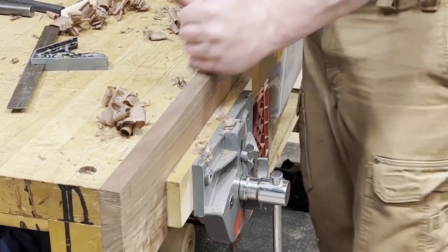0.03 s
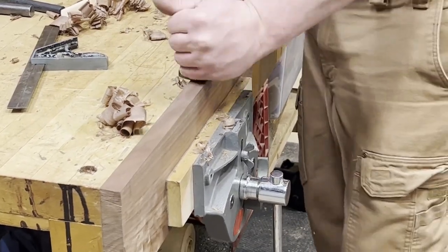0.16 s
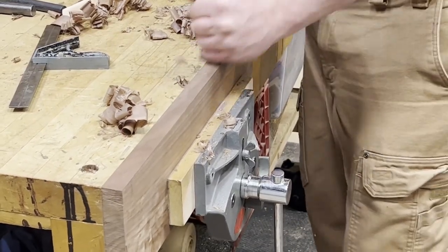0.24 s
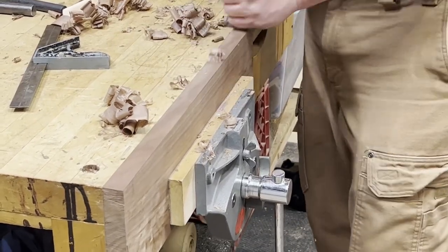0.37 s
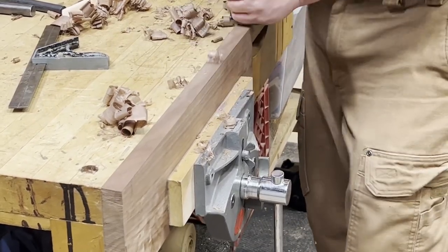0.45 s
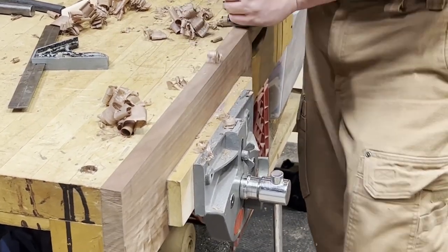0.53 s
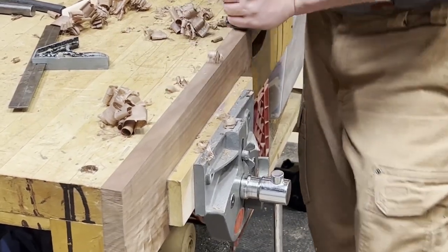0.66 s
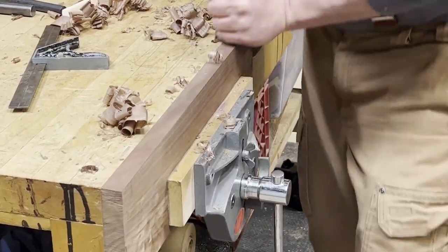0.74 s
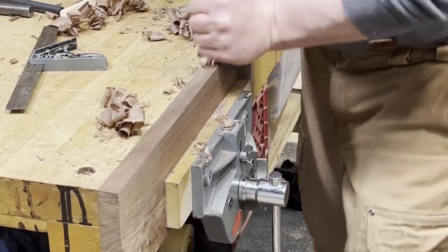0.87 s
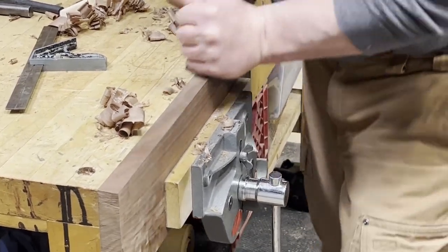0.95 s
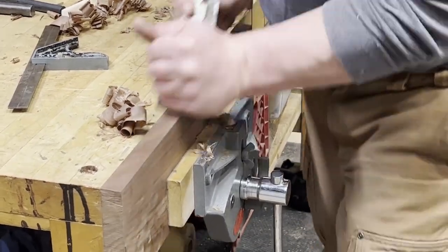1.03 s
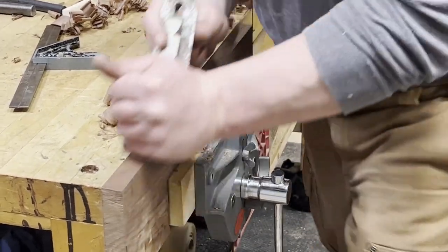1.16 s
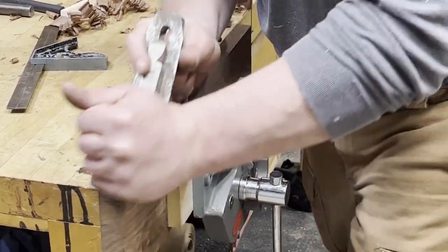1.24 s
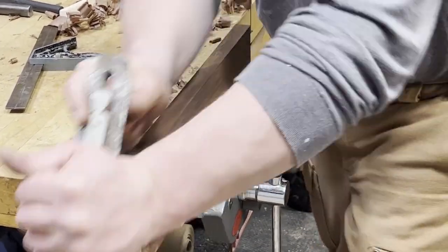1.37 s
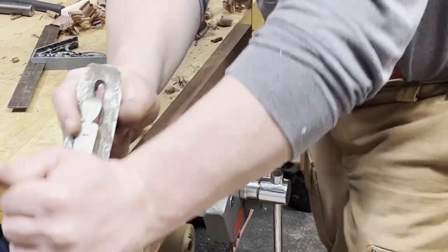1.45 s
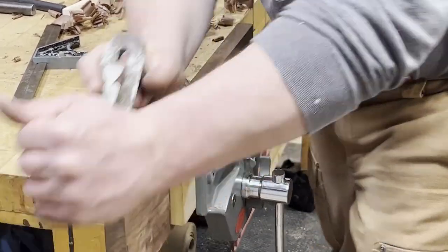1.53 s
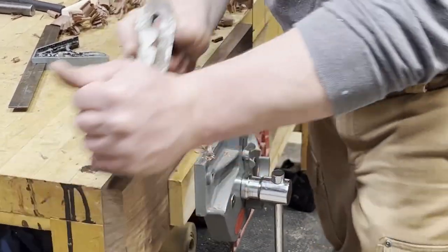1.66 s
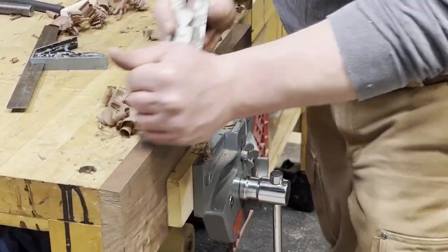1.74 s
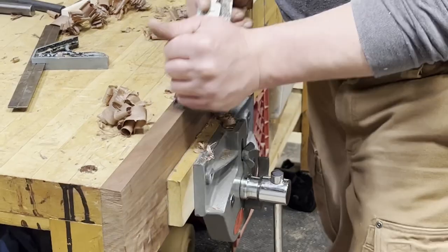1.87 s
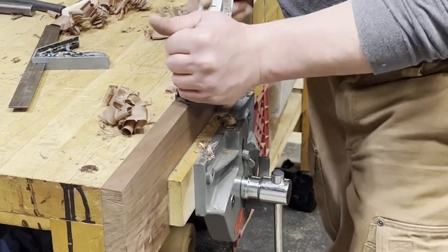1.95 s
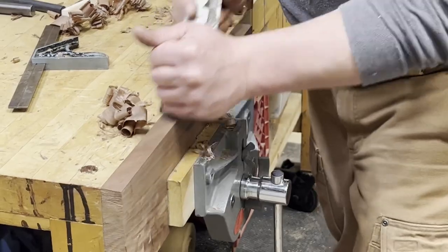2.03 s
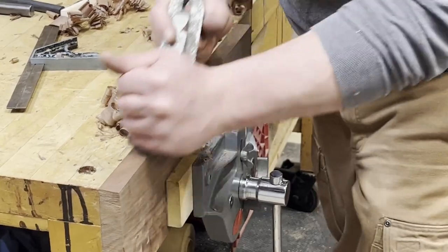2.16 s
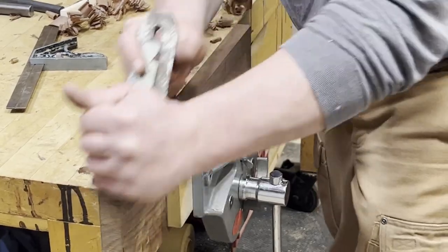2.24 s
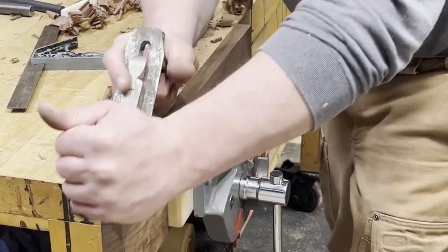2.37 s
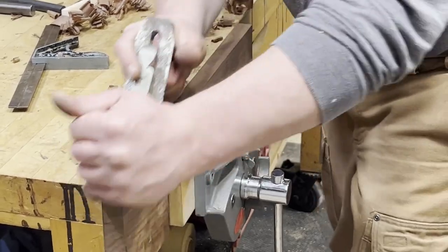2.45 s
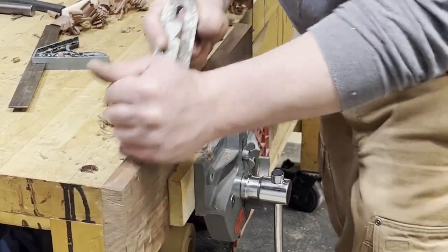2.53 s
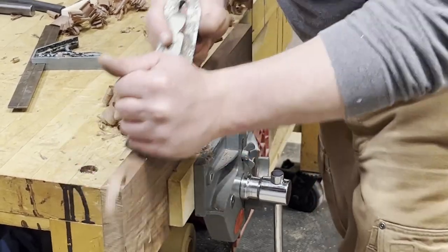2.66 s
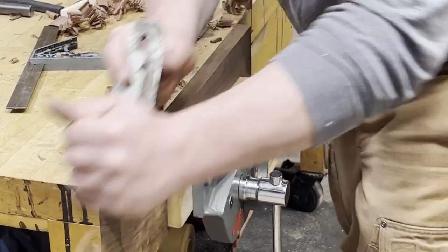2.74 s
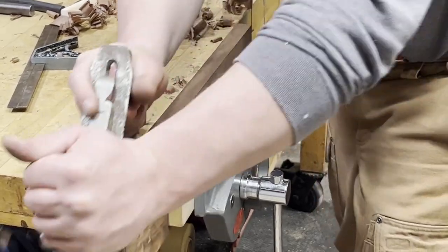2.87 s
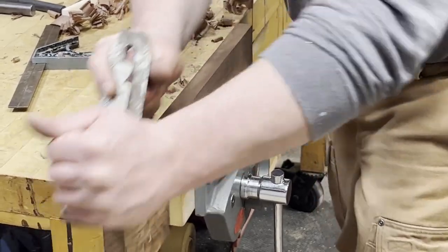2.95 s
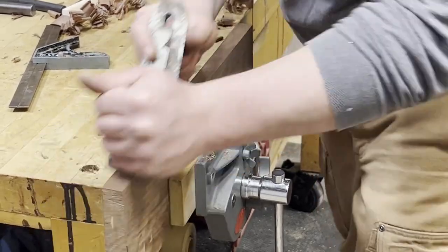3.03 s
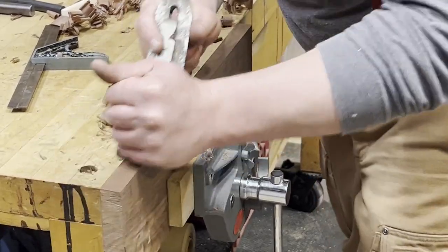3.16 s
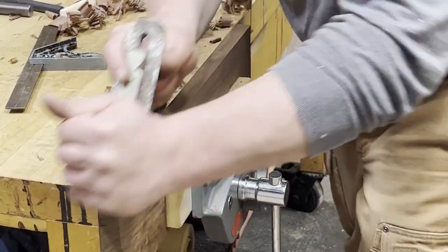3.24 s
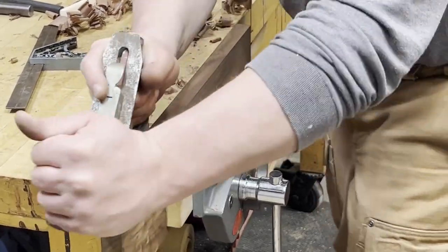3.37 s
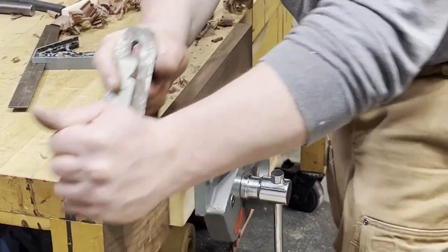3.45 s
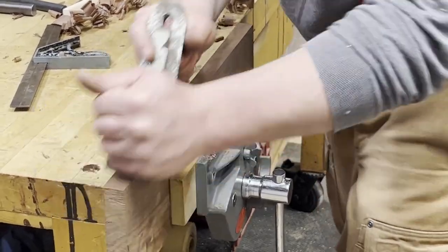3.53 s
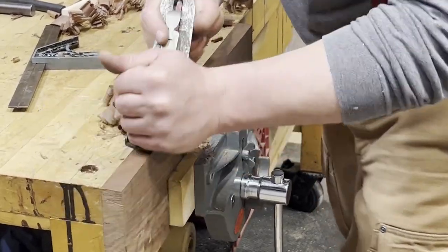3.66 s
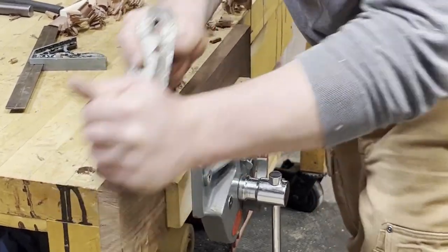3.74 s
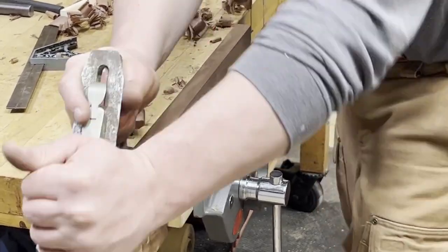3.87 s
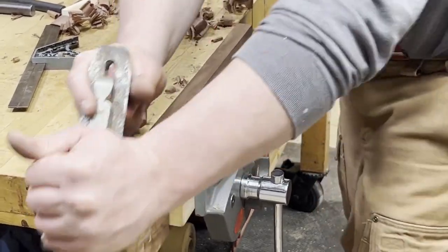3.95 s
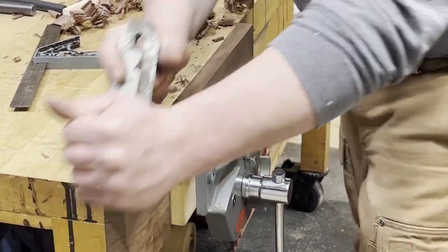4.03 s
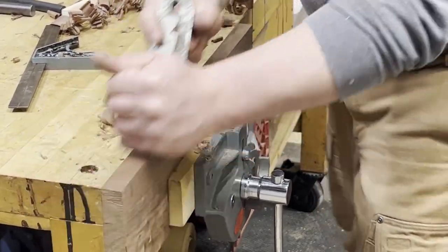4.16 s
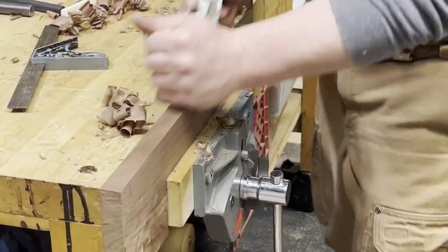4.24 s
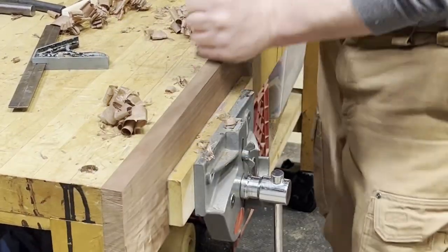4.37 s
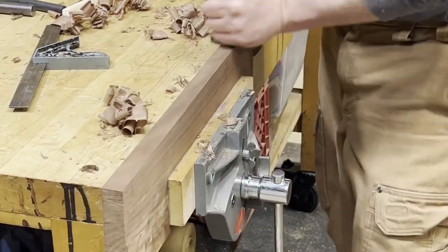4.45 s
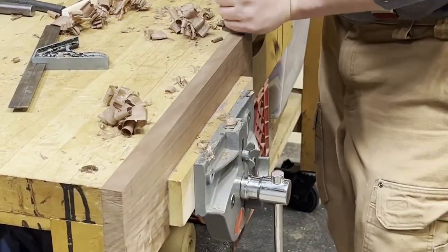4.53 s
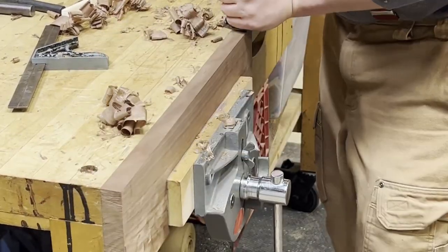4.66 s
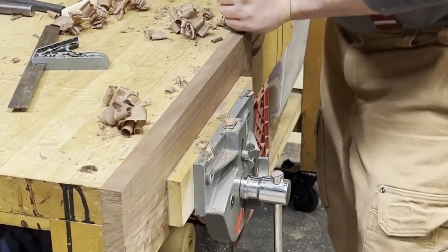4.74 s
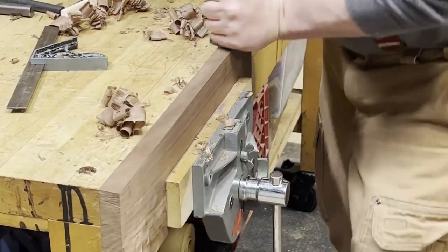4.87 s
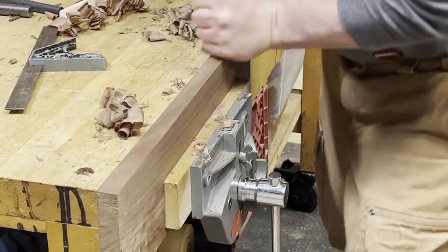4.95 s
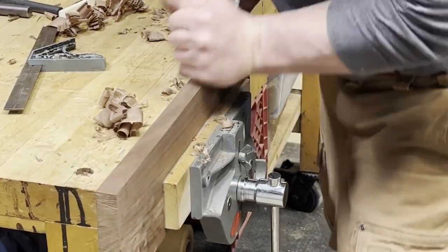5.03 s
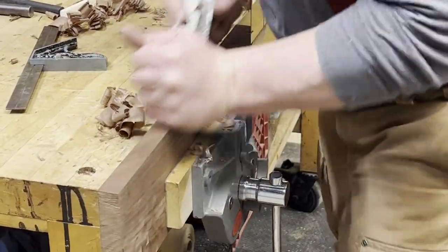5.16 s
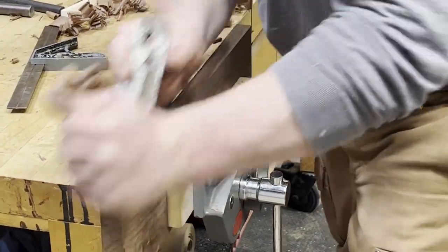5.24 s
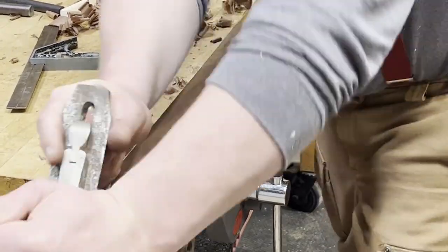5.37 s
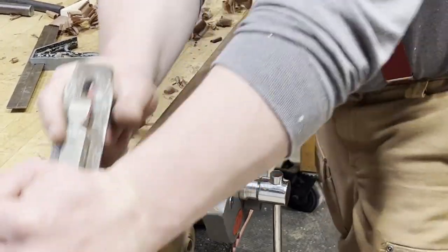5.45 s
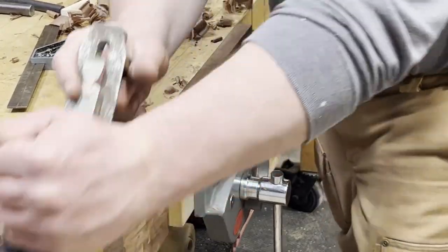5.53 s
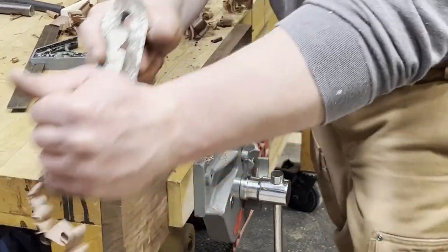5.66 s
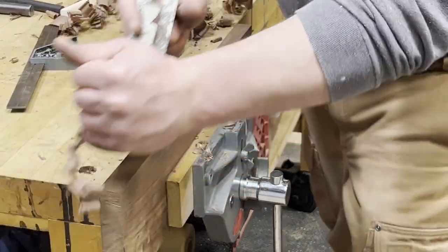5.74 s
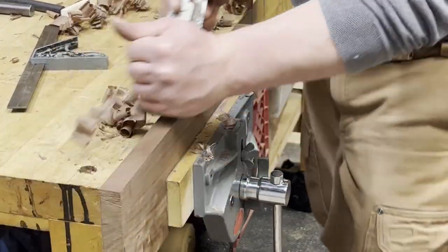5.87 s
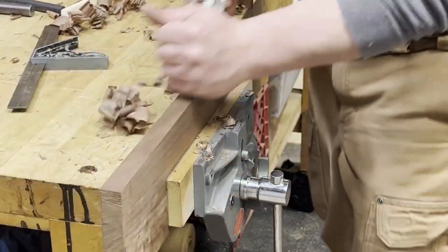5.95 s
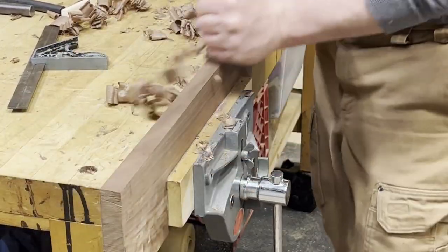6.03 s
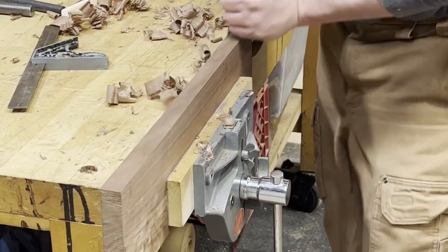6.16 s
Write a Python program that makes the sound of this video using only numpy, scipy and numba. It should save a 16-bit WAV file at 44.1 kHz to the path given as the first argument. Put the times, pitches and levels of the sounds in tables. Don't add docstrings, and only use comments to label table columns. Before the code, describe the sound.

A low, soft workshop hum runs throughout, with a short room tail behind close, dry sounds at a phone microphone. At 0 s the end of a planing cut rasps and rings for a tenth of a second, then light bumps and a brief rub follow. From 0.6 to 1.3 s a stroke tears in bursts, crisp shaving hiss with a high metallic ring around 3 kHz. Small taps follow, then a hard woody clack at 1.8 s. Cutting resumes at 2.1 s, interrupted by the heaviest knock at 2.4 s and a sharp one at 2.8 s, with rasps at 3.2 and 3.7 s. The plane skims faintly back at 4.0-4.4 s with a knock at 4.3. After near-quiet, a harder cut scrapes and snaps from 4.8 to 5.3 s, stutters in little bumps, then a set-down clack at 5.9 s and a last light skim.

```python
import sys
import numpy as np
from scipy import signal
from scipy.fft import rfft, irfft
from scipy.io import wavfile
from scipy.ndimage import uniform_filter1d, map_coordinates
from numba import njit

SR = 44100
rng = np.random.default_rng(int(sys.argv[2]) if len(sys.argv) > 2 else 0)


def amplitude_ratio(level_db):
    exponent = np.asarray(level_db, float) / 20
    return 10 ** exponent


def unload_wav(signal):
    wavfile.write(
        sys.argv[1],
        SR,
        np.round(np.clip(np.atleast_2d(signal).T, -1, 1) * 32767).astype(np.int16),
    )


N = 273416

GRIP_S = 0.0037
BODY_LAG_S = 0.01


def unit(x):
    return x / np.sqrt(np.mean(x ** 2))


def ring(x, modes):
    return sum((-1) ** k * amplitude_ratio(db) * signal.lfilter(*signal.iirpeak(hz, hz / width_hz, SR), x)
               for k, (hz, width_hz, db) in enumerate(modes))


def steady_ring(push, modes, level_db):
    return ring(amplitude_ratio(level_db) * push, modes) / np.std(ring(push[:SR], modes))


def colour(x, points):
    hz, db = np.transpose(points)
    bins = np.arange(1, N // 2 + 2) * SR / N
    return irfft(rfft(x) * amplitude_ratio(np.interp(np.log(bins), np.log(hz), db)), N)


def walk(rate_hz):
    k = int(SR / rate_hz)
    held = np.repeat(rng.standard_normal(N // k + 1), k)
    return unit(uniform_filter1d(held, k)[:N])


def fibres(rate_hz, spread_db, chatter_db, chatter_hz):
    clicks = (rng.random(N) < rate_hz / SR) * rng.standard_normal(N)
    clicks = clicks * amplitude_ratio(spread_db * np.minimum(rng.exponential(size=N), 3))
    return clicks * amplitude_ratio(chatter_db * walk(chatter_hz))


def flexed(x, rate_hz):
    delay = 0.004 * SR / rate_hz * uniform_filter1d(walk(rate_hz), int(SR / rate_hz / 2))
    return map_coordinates(x, [np.arange(N) - delay], order=3, mode="nearest")


# at_s, level_db
REST = [(0.15, -59.5), (.47, -63), (.59, -68), (.7, -68.5), (1.0, -53.5), (1.4, -62.5), (1.65, -70.5),
        (2.05, -69.5), (2.45, -65), (2.9, -63.5), (3.4, -63.5), (4.0, -66.5), (4.45, -57.5), (4.64, -84.5),
        (4.78, -68.5), (5.4, -62.5), (5.87, -72.5), (6.2, -66)]


def contact(rows, grip_s, fall_db_per_s, rest_db):
    t = np.arange(N // 64 + 2) * 64 / SR
    start_s, length_s, first_db, last_db = np.transpose(rows)[:, :, None]
    since = t - start_s
    slide_db = first_db + (last_db - first_db) * np.clip(since / length_s, 0, 1)
    fall_db = fall_db_per_s * np.maximum(since - length_s, 0)
    grip_db = 20 * np.log10(np.clip((since + 1e-4) / grip_s, 1e-6, 1))
    db = (slide_db - fall_db + grip_db).max(axis=0)
    db = np.maximum(db, rest_db + np.interp(t, *np.transpose(REST)))
    return np.interp(np.arange(N) / SR, t, db)


# at_s, board_db, board_hz, clack_db, tick_db
KNOCKS = [(0.272, -32, 367, -61, -50), (0.999, -42, 290, -54, -27.5), (1.761, -14, 386, -27, -16),
          (2.356, -11.5, 480, -22, -44), (2.767, -23, 368, -44, -14.5), (2.957, -31.5, 356, -45.5, -69),
          (3.307, -24.5, 342, -52, -27), (3.813, -32, 425, -60, -43), (3.912, -28.5, 300, -44, -65),
          (4.313, -19.5, 300, -41, -25.5), (5.529, -36.5, 332, -44, -71), (5.897, -15.5, 412, -30, -21.5)]
# at_s, board_db, clack_db, tick_db
TAPS = [(0.505, -38.5, -47.5, -39), (0.61, -51, -48.5, -28), (1.328, -34, -60, -22), (1.434, -34, -43, -68),
        (1.467, -33.5, -46, -36), (1.517, -41, -55, -40), (1.908, -56, -52.5, -42),
        (3.406, -50, -43.5, -62), (3.509, -35, -44.5, -66), (4.149, -41, -39.5, -55),
        (4.804, -41, -65, -37), (5.347, -46, -45, -57), (5.755, -57, -60, -44), (6.145, -43, -63, -62)]


def blows():
    return KNOCKS + [(s, board_db, 345, clack_db, tick_db) for s, board_db, clack_db, tick_db in TAPS]


def rattle(column, db, lag_s=0.):
    return [(blow[0] + lag_s, 0.03, blow[column] + db, blow[column] + db - 5.0) for blow in blows()]


# pitch_hz, width_hz, level_db
HUM = [(64, 33, -2), (85, 29, -0.5), (123.5, 12, -6)]
# pitch_hz, level_db
SHOP = [(100, 12), (200, 5.5), (400, -1), (1000, -35), (3000, -17), (8000, -41), (16000, -29)]
HUM_DB, SHOP_DB = -52, -60


def shop():
    hum = unit(ring(ring(rng.standard_normal(N), HUM), [(76.0, 340, 0)]))
    air = unit(colour(rng.standard_normal(N), SHOP))
    return amplitude_ratio(HUM_DB + 1.0 * walk(2.18)) * hum + amplitude_ratio(SHOP_DB) * air


ROOM_T60_S, TREBLE_T60_S, ROOM_DB = 0.38, 0.4, -9.5


def room(x):
    t = np.arange(SR // 2) / SR
    noise = rng.standard_normal(len(t)) * (t > .006)
    low = signal.lfilter(*signal.butter(1, 1500, fs=SR), noise)
    tail = low * np.exp(-np.log(1000) * t / ROOM_T60_S)
    tail = tail + 0.62 * (noise - low) * np.exp(-np.log(1000) * t / TREBLE_T60_S)
    wet = signal.fftconvolve(x, tail / np.sqrt(np.sum(tail ** 2)))[:N]
    return amplitude_ratio(ROOM_DB) * flexed(flexed(wet, 60), 45)


# start_s, length_s, start_db, end_db
DRAGS = [(0, 0.07, -31.5, -28.5), (.27, 0.063, -35, -32.5), (.72, 0.069, -37, -31),
         (.82, 0.21, -28.5, -36.5), (.98, 0.084, -30, -21), (1.2, 0.18, -35.5, -33),
         (1.42, 0.036, -29, -32), (2.06, 0.17, -39, -39), (2.28, 0.05, -43, -30), (2.6, 0.28, -38.5, -39.5),
         (2.96, 0.11, -43, -38), (3.23, 0.11, -34, -28), (3.41, 0.079, -29.5, -37.5),
         (3.5, 0.31, -49.5, -32), (3.91, 0.091, -31.5, -42.5), (4.15, 0.028, -26, -37.5),
         (4.23, 0.12, -37, -21), (4.36, 0.062, -33, -50), (4.81, 0.14, -35.5, -28), (4.97, 0.25, -36, -34),
         (5.27, 0.032, -24.5, -34), (5.342, 0.023, -21.5, -38.5), (5.41, 0.022, -38, -38.5),
         (5.53, 0.013, -20, -37), (5.58, 0.018, -38, -48), (5.98, 0.012, -17, -21.5),
         (6.13, 0.026, -36, -28.5)]
# at_s, level_db
THUDS = [(0.033, -40), (0.271, -40), (0.771, -41), (1.001, -40), (1.328, -32), (1.436, -38), (1.76, -33),
         (2.079, -39.5), (2.312, -36.5), (2.354, -27), (2.766, -29), (3.306, -36.5), (3.405, -38.5),
         (3.812, -34), (3.909, -41), (4.025, -39.5), (4.158, -40), (4.31, -38), (4.818, -37.5), (5.53, -46),
         (5.899, -35), (5.986, -43), (6.132, -42)]
# pitch_hz, width_hz, level_db
BOARD = [(271.8, 59.6, -2.5), (355, 61, -3), (409, 33.6, -0.5), (468, 63, -4), (510, 42, -6.5),
         (656, 110, -9.5)]
# pitch_hz, width_hz, level_db
BENCH = [(114.5, 27.4, -1), (143.2, 16.3, 1), (188.8, 26.6, -3)]


def woodwork():
    drag_db = contact(DRAGS, 0.0072, 430.0, 12.5)
    shake_db = contact(rattle(column=1, db=-3.5, lag_s=BODY_LAG_S), 0.0028, 320, 17.2)
    board_db = np.maximum(drag_db, shake_db)
    thud_db = contact([(s, .04, db, db) for s, db in THUDS], 0.015, 560, 8.3)
    bench_db = np.maximum(thud_db, 0.41 * board_db - 32)
    board = unit(ring(fibres(3000, 1.2, 1.5, 30), BOARD))
    bench = unit(ring(ring(fibres(1500, 1.2, 2.0, 20), BENCH), [(140, 120, 0)]))
    return amplitude_ratio(board_db - 10.0) * board + amplitude_ratio(bench_db - 3.5) * bench


def struck(push, modes):
    return ring(rng.standard_normal(len(push)) * push, modes)


def scaled(sound, db):
    return amplitude_ratio(db) * sound / np.std(sound[:SR // 20])


# pitch_hz, width_hz, level_db
CLACK = [(793, 146, 10.5), (1044, 106, 7.5), (1250, 94, 4), (1480, 200, 4), (1800, 290, 1), (2310, 250, -6),
         (2830, 250, -5.5)]
HARDNESS = .3


def knocks():
    out, t = np.zeros(N + SR), np.arange(SR // 4) / SR
    dull = signal.butter(5, 8000, fs=SR)
    late = np.maximum(t - BODY_LAG_S, 0)
    tick_shape = np.exp(-t / .0025) + .22 * np.exp(-t / .025)
    board_push = (1 - np.exp(-late / 0.00094)) * np.exp(-t / 0.0095)
    bench_push = (1 - np.exp(-late / 0.0083)) * np.exp(-t / 0.0069)
    for s, board_db, board_hz, clack_db, tick_db in blows():
        tick = signal.lfilter(*dull, rng.standard_normal(len(t))) * tick_shape
        board = struck(board_push, BOARD + [(board_hz, 60, 6)])
        tilt = np.clip(HARDNESS * (tick_db - clack_db + 10), -3, 6)
        modes = [(hz, width_hz, db + tilt * np.log2(hz / 1200)) for hz, width_hz, db in CLACK]
        clack = struck(np.exp(-t / 0.013), modes) + ring(9 * (t == 0), modes)
        blow = amplitude_ratio(tick_db - 10.0) * tick + scaled(board, board_db - 16.5) + scaled(clack, clack_db - 5.5)
        out[int(s * SR):int(s * SR) + len(t)] += blow
    for s, db in THUDS:
        out[int(s * SR):int(s * SR) + len(t)] += scaled(struck(bench_push, BENCH), db - 11)
    return out[:N]


def sings(rows, rise_s, fall_s, rough_db, rough_hz):
    out, t = np.zeros(N + SR), np.arange(SR // 5) / SR
    uneven = amplitude_ratio(rough_db * walk(rough_hz))
    rise = np.sin(np.pi / 2 * np.clip(t / rise_s, 0, 1))
    for (s, length_s, db, hz), phase in zip(rows, rng.random(len(rows))):
        shape = rise * np.exp(-np.maximum(t - length_s - rise_s / 2, 0) / fall_s)
        at = max(int((s - rise_s / 2) * SR), 0)
        out[at:at + len(t)] += np.sqrt(2) * amplitude_ratio(db) * shape * np.sin(2 * np.pi * (hz * t + phase))
    return out[:N] * uneven


# start_s, length_s, level_db, pitch_hz
BOOMS = [(0.035, 0.014, -35, 165), (1.01, 0.014, -37, 142), (1.333, 0.012, -30, 140),
         (1.779, 0.009, -29, 149), (2.373, 0.022, -29.5, 130), (2.782, 0.021, -30.5, 150),
         (3.314, 0.025, -40, 147), (3.818, 0.013, -26, 129.5), (3.865, 0.022, -39, 110),
         (5.283, 0.013, -40, 150), (5.913, 0.021, -37.5, 150), (5.984, 0.023, -35, 140),
         (6.147, 0.022, -38, 144)]
# start_s, length_s, level_db, pitch_hz
SWINGS = [
    (0.999, 0.011, -30.5, 347),
    (1.052, 0.017, -36, 381),
    (1.776, 0.022, -26.5, 390),
    (2.365, 0.012, -19.5, 411),
    (3.314, 0.014, -39, 345),
    (4.248, 0.028, -32.5, 395),
    (4.325, 0.043, -31, 358),
    (5.486, 0.021, -41.5, 326),
    (5.908, 0.013, -24.5, 348),
    (5.986, 0.03, -31, 409),
]
# start_s, length_s, level_db, pitch_hz
CATCHES = [(0.003, 0.007, -31, 2940), (0.048, 0.011, -41, 2906), (0.744, 0.0087, -39, 2886),
           (0.883, 0.0099, -40, 2986), (1.101, 0.0082, -43, 2920), (1.13, 0.027, -41, 2940),
           (1.183, 0.012, -26, 2954), (1.272, 0.025, -41, 2974), (1.312, 0.0076, -33, 2955),
           (2.114, 0.0091, -41, 2990), (2.172, 0.0082, -28, 2954), (2.221, 0.016, -28.5, 2957),
           (2.258, 0.007, -32, 2910), (2.657, 0.0078, -35, 2970), (2.672, 0.0059, -38, 2933),
           (2.754, 0.013, -35.5, 3002), (3.031, 0.0098, -37.5, 2948), (3.227, 0.027, -30, 2882),
           (3.474, 0.021, -40.5, 2990), (3.532, 0.026, -42, 2964), (3.787, 0.013, -36.5, 3010),
           (4.146, 0.022, -33.5, 2948), (4.313, 0.0089, -39, 2960), (5.056, 0.009, -35, 2900),
           (5.085, 0.0067, -33, 2900), (5.126, 0.029, -27, 3020), (5.169, 0.019, -32, 2963),
           (5.261, 0.011, -39, 3005), (6.011, 0.024, -40.5, 2905)]
# start_s, length_s, level_db, pitch_hz
JERKS = [(0.003, 0.0067, -35, 3430), (0.894, 0.024, -40, 3390), (1.068, 0.0099, -31, 3360),
         (1.162, 0.015, -49, 3410), (1.291, 0.012, -41, 3430), (2.11, 0.0072, -42, 3460),
         (2.164, 0.0071, -38, 3428), (2.207, 0.017, -35, 3466), (2.279, 0.015, -33.5, 3380),
         (2.749, 0.013, -41, 3420), (3.186, 0.0058, -34, 3420), (3.198, 0.0077, -36, 3410),
         (3.216, 0.017, -35, 3370), (3.253, 0.011, -35, 3400), (3.281, 0.0064, -39, 3385),
         (3.784, 0.0071, -25, 3394), (4.312, 0.0045, -36.5, 3380), (4.971, 0.017, -34, 3430),
         (5.05, 0.01, -29, 3386), (5.075, 0.013, -30, 3460), (5.165, 0.008, -29, 3380),
         (5.181, 0.007, -39, 3410), (5.259, 0.0062, -32.5, 3390)]
# start_s, length_s, level_db, pitch_hz
RINGS = [
    (.268, 0.025, -51, 6800),
    (2.19, 0.025, -41, 3790),
    (3.768, 0.013, -29.5, 3780),
    (5.236, 0.0058, -32, 3900),
    (5.15, 0.022, -36, 3800),
    (1.28, 0.023, -45, 2400),
    (2.9, 0.015, -41, 3750),
    (5.256, .014, -41, 7500),
    (1.071, 0.0034, -26.5, 2900),
]


def swings():
    bench = amplitude_ratio(-3.6) * sings(BOOMS, 0.011, 0.0076, 1.2, 60)
    board = amplitude_ratio(-3.5) * sings(SWINGS, 0.006, 0.0053, 2.6, 90)
    iron = amplitude_ratio(-0.5) * sings(CATCHES, .008, 0.0037, 2.0, 280)
    body = amplitude_ratio(-2.0) * sings(JERKS + RINGS, .005, 0.0024, 2.0, 330)
    return bench + board + iron + body


# at_s, peak_db, pitch_hz
SNAPS = [(1.2, -23, 2680), (1.643, -53, 7500), (2.358, -42, 12500), (2.713, -22.5, 11500),
         (3.787, -18, 3500), (4.314, -30, 5000), (4.744, -53, 2500), (5.134, -17, 3070),
         (5.137, -18.5, 3050), (5.146, -25, 3200), (5.155, -31, 3400), (5.753, -43, 9000),
         (5.948, -32, 11000), (5.258, -27, 4200)]


def snaps():
    out, t = np.zeros(N), np.arange(SR // 50) / SR
    for s, db, hz in SNAPS:
        click = struck(np.exp(-t / 0.0008), [(hz, 0.4 * hz, 0)])
        out[int(s * SR):int(s * SR) + len(t)] += amplitude_ratio(db) * click / np.abs(click).max()
    return out


@njit
def sweep(x, hz, width):
    y, band, low = np.empty(len(x)), 0., 0.
    for i in range(len(x)):
        g = np.tan(np.pi * hz[i] / SR)
        v = (band + g * (x[i] - low)) / (1 + g * (g + width))
        band, low, y[i] = 2 * v - band, low + 2 * g * v, width * v
    return y


# start_s, end_s, from_hz, to_hz, level_db
ZIPS = [(0.745, 0.863, 730, 950, -41), (0.807, 0.911, 726, 1740, -35), (1.174, 1.25, 2680, 1330, -35.5),
        (1.233, 1.29, 1400, 1800, -41), (2.258, 2.317, 2800, 1310, -40), (2.097, 2.143, 1900, 1990, -44.5),
        (2.174, 2.213, 2300, 1500, -42.5), (3.233, 3.317, 2400, 900, -41.5),
        (3.674, 3.708, 1160, 1260, -39), (4.342, 4.387, 1705, 1676, -37), (4.37, 4.447, 1180, 2150, -45.5),
        (4.82, 4.875, 880, 824, -39), (4.916, 5.013, 980, 2270, -34), (5.034, 5.103, 1430, 1950, -37.5),
        (0, 0.073, 1770, 1760, -35), (0.276, 0.313, 1650, 2030, -39), (5.585, 5.883, 773, 730, -62)]


def zips():
    out, grit = np.zeros(N), fibres(10000, 1.2, 2.0, 120)
    for start_s, end_s, from_hz, to_hz, db in ZIPS:
        a, b = int(start_s * SR), int(end_s * SR)
        hz = np.geomspace(from_hz, to_hz, b - a)
        width = .05 + .2 * abs(np.log(to_hz / from_hz))
        sung = sweep(sweep(grit[a:b], hz, width), hz, .45)
        out[a:b] += amplitude_ratio(db) * unit(sung) * np.sin(np.linspace(0, np.pi, b - a)) ** 0.72
    return out


# pitch_hz, width_hz, level_db
STRUCK_IRON = [(6500, 300, -4), (7760, 260, 1)]


def shiver():
    noise = rng.standard_normal(N)
    broad = unit(colour(noise, [(2000, 6), (8000, -4), (12000, -15)]))
    sound = broad + 0.73 * unit(ring(noise, STRUCK_IRON))
    return amplitude_ratio(contact(rattle(column=4, db=-27.5), 0.002, 350, -24)) * sound


# start_s, length_s, start_db, end_db
RUBS = [(0, 0.097, -35.5, -44), (.262, 0.05, -48, -40.5), (.604, 0.034, -46, -44), (.72, 0.045, -47, -31),
        (.8, 0.13, -37, -29), (.95, 0.13, -45, -42.5), (1.19, 0.13, -44, -37.5), (1.43, 0.15, -47, -51.5),
        (2.07, 0.44, -49.5, -46), (2.7, 0.054, -46.5, -46), (2.956, 0.29, -54.5, -52.5),
        (3.2, 0.06, -48.5, -39.5), (3.27, 0.036, -49, -37.5), (3.409, 0.2, -45.5, -49),
        (3.66, 0.049, -47, -40), (3.75, 0.043, -54, -30), (3.91, 0.15, -53, -50.5),
        (4.25, 0.21, -53, -38.5), (4.807, 0.14, -41, -46.5), (4.91, 0.068, -31.5, -27),
        (5.0, 0.075, -44, -40), (5.11, 0.18, -50, -46), (5.345, 0.02, -47, -50), (5.412, 0.025, -49, -48),
        (5.45, 0.012, -57, -52.5), (5.53, 0.016, -44, -46.5), (5.585, .012, -53, -51),
        (5.94, 0.18, -42, -54), (6.1, 0.049, -52, -44.5)]
# pitch_hz, width_hz, level_db
SOLE = [(690, 16, -4), (805.5, 12, 5.5), (890, 19, -14), (1017, 11.5, 8.5), (1223, 28, -4),
        (1319, 8.6, 5.5), (1554, 110, -13.5), (1798, 23, -0.5)]


def rubbing():
    slide_db = contact(RUBS, GRIP_S, 480, 7.7)
    loose_db = contact(rattle(column=3, db=-9.0), 0.0037, 405, 4.8)
    grit = unit(fibres(8000, 1.5, 2.0, 80))
    wood = unit(colour(grit, [(400, -15.5), (750, -1.0), (1400, -2.0), (2300, -6.5), (3500, -14.0), (9000, -37)]))
    return amplitude_ratio(np.maximum(slide_db, loose_db) - 3.5) * (wood + 0.52 * unit(ring(grit, SOLE)))


def patchy(x, patchy_db, rate_hz):
    octave, spectrum = np.log2(np.arange(1, N // 2 + 2) * SR / N), rfft(x)
    out = np.zeros(N)
    for k in range(30, 43):
        band = np.clip(1 - 3 * np.abs(octave - k / 3), 0, 1)
        out += amplitude_ratio(patchy_db * walk(rate_hz)) * irfft(spectrum * band, N)
    return out


# pitch_hz, level_db
SHAVING = [(1500, -12.5), (2500, -4.5), (4500, 3.5), (6000, 2), (6800, 5), (8000, 2), (9800, 1),
           (11200, 2.5), (12500, -3.5), (15600, -1.5), (17000, -31)]


def shaving(tear, hiss_db):
    curl = colour(tear + 2.0 * fibres(12000, 0.5, 0.245, 70), SHAVING)
    return amplitude_ratio(hiss_db - 0.5) * unit(patchy(curl, 2.0, 70))


# start_s, length_s, hiss_start_db, hiss_end_db, metal_over_hiss_db
CUTS = [(0, 0.088, -37, -49.5, 3.5), (0.6, 0.031, -51.5, -41, -4), (0.7, 0.061, -55, -42, -1),
        (0.784, 0.15, -50, -41.5, 0.5), (1.045, 0.12, -42, -44, 4), (1.158, 0.097, -40.5, -52.5, 6.5),
        (1.22, 0.095, -54, -36.5, 0.5), (2.058, 0.15, -48.5, -41.5, 5.5), (2.183, 0.12, -47.5, -42, 6.5),
        (2.648, 0.036, -46.5, -42, 4), (2.711, 0.048, -43, -32, -4), (3.165, 0.073, -46.5, -38, 3.5),
        (3.24, 0.071, -36.5, -50.5, 4.5), (3.656, 0.066, -57, -42, 5), (3.743, 0.055, -38, -29.5, -3.5),
        (4.8, 0.041, -50.5, -45, 2), (4.885, 0.074, -57.5, -36.5, -2), (4.951, 0.13, -46, -37.5, 2),
        (5.079, 0.11, -39, -35.5, 1.5), (5.177, 0.086, -40.5, -29, -19)]
# start_s, length_s, hiss_start_db, hiss_end_db, metal_over_hiss_db
SKIMS = [(.262, 0.049, -51, -54, 8.5), (0.431, 0.027, -60, -52, -8), (0.512, .015, -59, -64, -1),
         (2.404, 0.075, -66, -57, 4), (2.473, 0.086, -54, -59.5, 8.5), (2.95, 0.098, -59, -57, 12.5),
         (3.446, 0.13, -60.5, -60.5, 13), (4.029, 0.14, -60, -59.5, 13), (4.134, 0.082, -54, -51.5, 7.5),
         (4.227, 0.21, -55.5, -56.5, 9), (5.543, 0.095, -57.5, -65, -10), (2.63, .022, -64, -51, -8),
         (5.883, .011, -58, -55, -8), (5.966, 0.167, -54.5, -59, 6.5)]
# pitch_hz, width_hz, level_db
IRON = [(2010, 50, -22), (2600, 300, -18), (2830, 130, -11), (2900, 70, -9), (2960, 60, -5),
        (2300, 500, -25), (3145, 45, -12)]
# pitch_hz, width_hz, level_db
FREE_IRON = [(2430, 63, -8.5), (2960, 760, -9.5), (2950, 37, 2.5), (5170, 55, -19), (3404, 106, -3.5),
             (5550, 110, -24.5), (3730, 65, -5.5), (4480, 60, -21.5), (6716, 65, -15.5)]
# pitch_hz, width_hz, level_db
BODY = [(3335, 100, 0.5), (3500, 52, 3), (3790, 87, 1.5), (4040, 28, -4), (4210, 190, -10), (6790, 160, -4),
        (5820, 140, -12), (13300, 180, -14)]
BITE = 0.3


def metal_rows(rows):
    return [(s, length_s, a_db + over_db, b_db + over_db) for s, length_s, a_db, b_db, over_db in rows]


def plane():
    blade = [(max(s, 0) - GRIP_S * (s <= 0), *rest) for s, *rest in CUTS + SKIMS]
    hiss_db = contact([row[:4] for row in blade], GRIP_S, 589, 0.1)
    cut_db = contact(metal_rows(blade[:len(CUTS)]), GRIP_S, 1500, -19)
    skim_db = contact(metal_rows(SKIMS), GRIP_S, 920, -38)
    body_db = cut_db + BITE * (np.maximum(hiss_db, -60) + 47.0) + 1.0 * walk(33)
    iron_db = cut_db + .8 * walk(30)
    tear, stroke = fibres(11000, 1.0, 1.3, 110), fibres(9000, 1.1, 1.6, 90)
    iron = steady_ring(tear, IRON, iron_db - 1.9) + steady_ring(stroke, FREE_IRON, skim_db + 2.5)
    body = steady_ring(tear, BODY, body_db - 2.5)
    metal = flexed(iron, 22) + flexed(body, 31)
    return metal + shaving(tear, hiss_db) + rubbing() + shiver() + zips()


# pitch_hz, left_lead_rad, unrelated_share
PORTS = [(0, 0, .06), (400, 0, .2), (900, .2, .52), (1500, .05, .22), (1950, 0, 0), (2400, 0, 0),
         (3000, .5, .1), (4300, .65, .22), (5500, 0, .03), (5900, -.7, .3), (6350, 0, 0), (7450, 0, 0),
         (8800, -1.3, .35), (9400, -3.1, .05), (10500, -3.16, .03), (11000, -4.1, .3), (12100, -5.0, .45),
         (12700, -6.283, 0), (14200, -6.283, 0), (15700, -8.9, .55)]


def scene():
    near = plane() + woodwork() + knocks() + swings() + snaps()
    sound = near + room(near) + shop()
    t = np.arange(SR // 10) / SR
    scatter = rng.standard_normal(len(t)) * np.exp(-t / 0.026)
    scattered = signal.fftconvolve(sound, scatter / np.sqrt(np.sum(scatter ** 2)))[:N]
    hz, lead_rad, share = np.transpose(PORTS)
    bins = np.arange(N // 2 + 1) * SR / N
    lead_rad = np.interp(bins, hz, lead_rad)
    share = np.clip(np.interp(bins, hz, share), 0, .9)
    common, apart = np.sqrt(1 - share ** 2) * rfft(sound), share * rfft(scattered)
    return np.array([irfft(np.exp(.5j * side * lead_rad) * (common + side * apart), N) for side in (1, -1)])


def low_pass(x):
    return signal.sosfilt(signal.butter(12, 15750, fs=SR, output="sos"), x)


LOW_HZ, TOP_HZ = 41.8, 15750


def record(dry):
    dry = signal.sosfilt(signal.butter(3, LOW_HZ, "high", fs=SR, output="sos"), dry)
    dry = signal.sosfilt(signal.ellip(10, .2, 70, TOP_HZ, fs=SR, output="sos"), dry)
    return low_pass(dry)


dry = scene()
out = record(dry)
unload_wav(out)
```